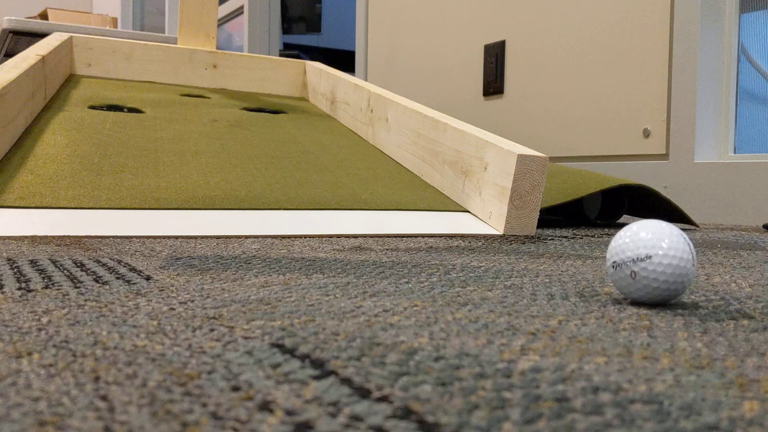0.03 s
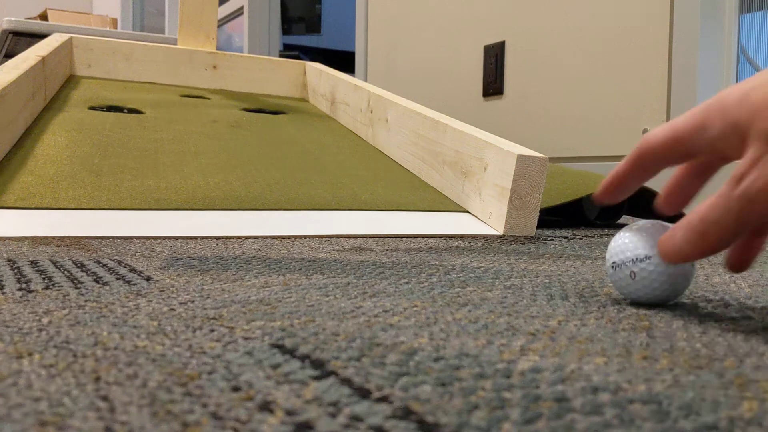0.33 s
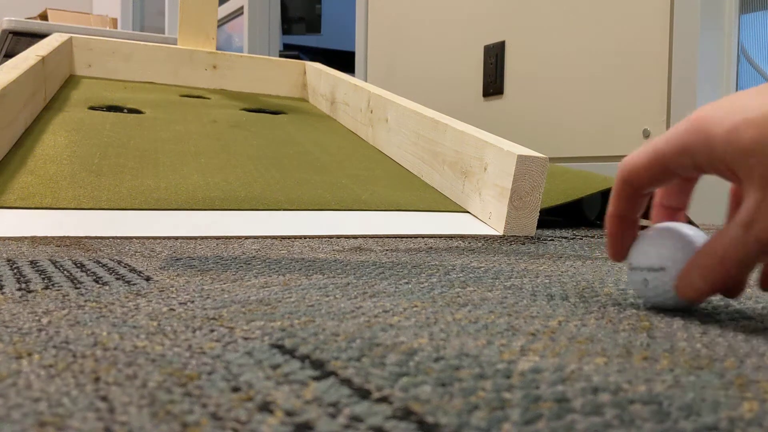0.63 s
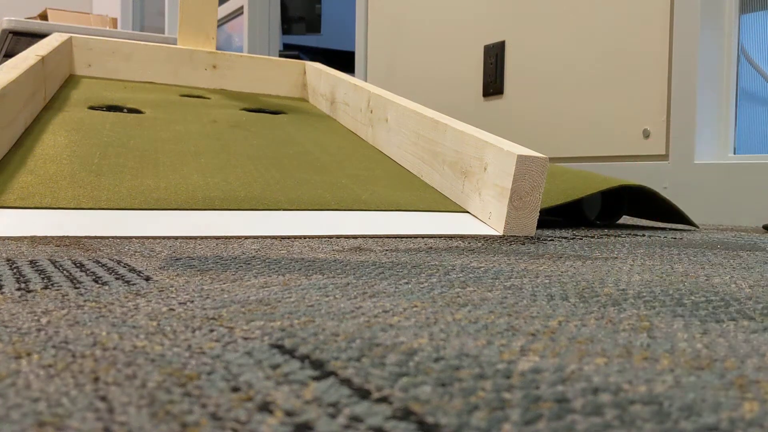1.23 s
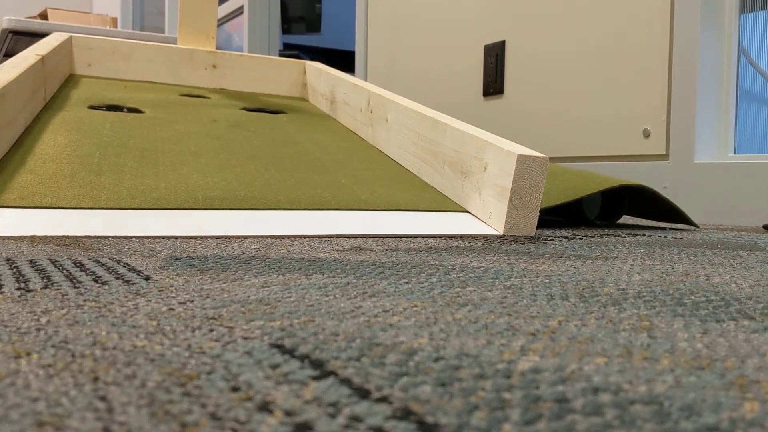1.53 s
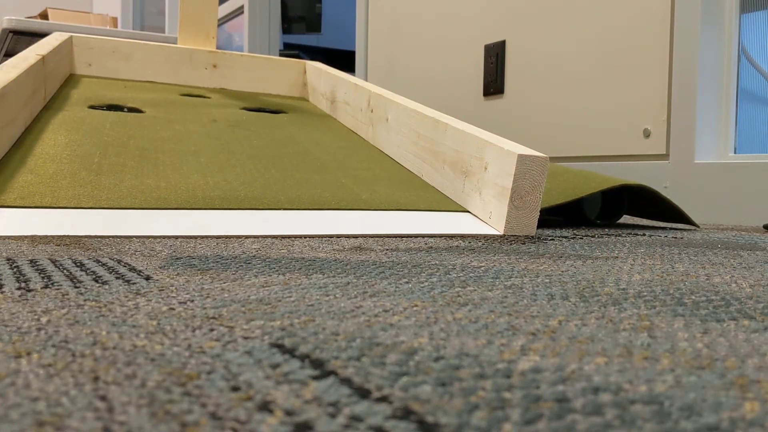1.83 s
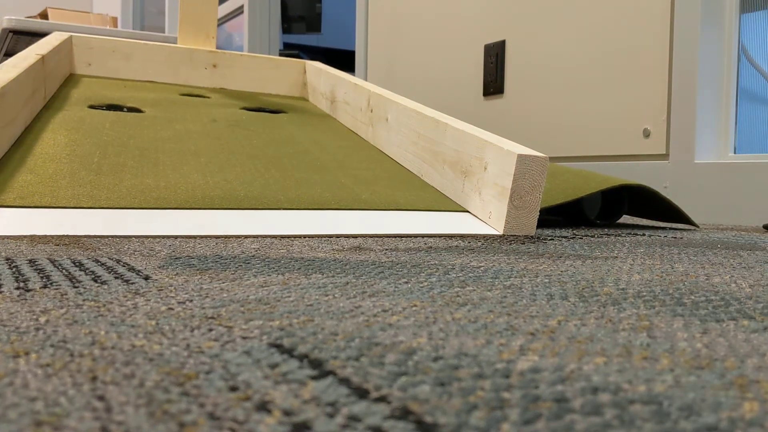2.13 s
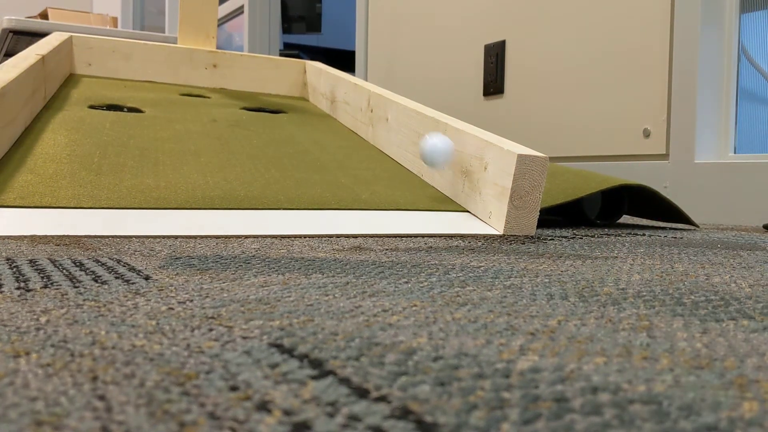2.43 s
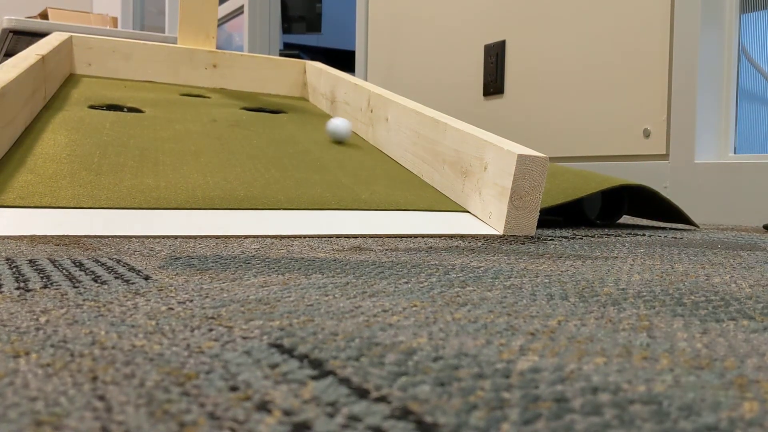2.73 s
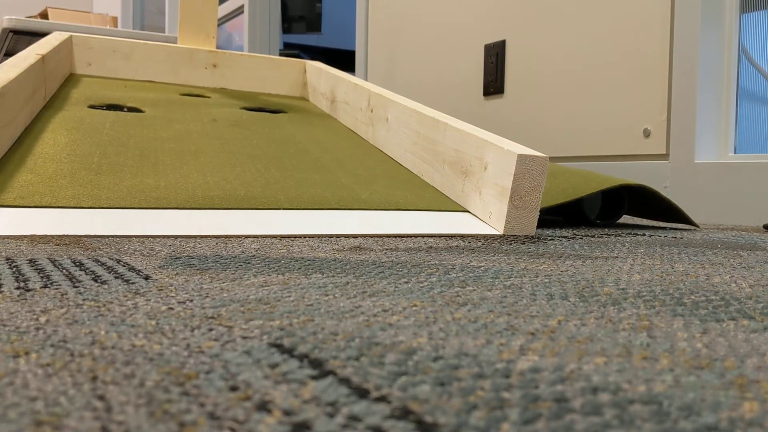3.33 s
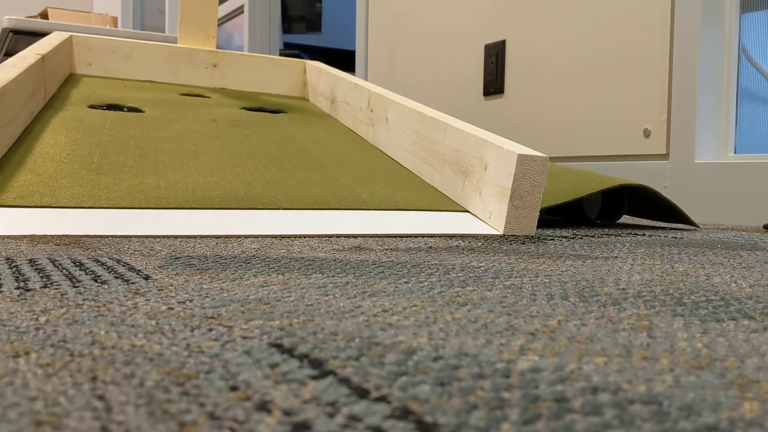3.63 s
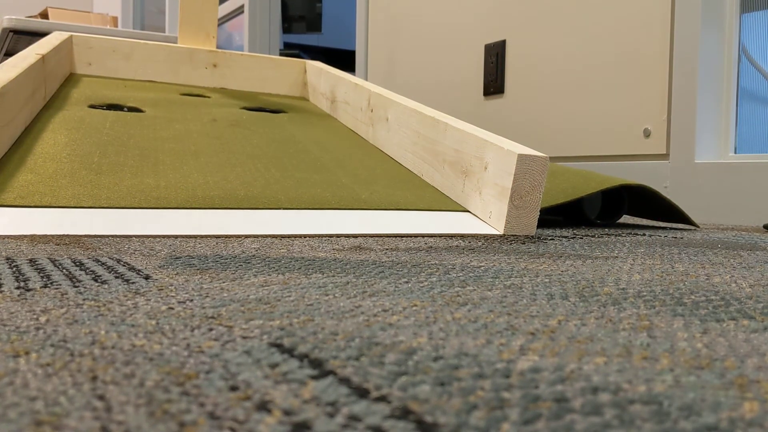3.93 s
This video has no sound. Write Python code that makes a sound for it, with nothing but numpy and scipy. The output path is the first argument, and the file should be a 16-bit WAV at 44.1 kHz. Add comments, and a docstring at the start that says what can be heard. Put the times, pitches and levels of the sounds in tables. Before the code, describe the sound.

A golf ball is putted up a wooden ramp into a hole, heard from the floor of a small room. At first there is only low ventilation rumble and faint rustling. At 2.5 seconds the ball bangs on the ramp's lip, bounces softly on felt and rolls with a fading rumble. From about 3.3 to 3.7 seconds it rattles into the hole with hollow wooden knocks and hard clicks.

```python
"""Ventilation rumbles in a small quiet room, heard from the floor; carpet and cloth rustle faintly.
A golf ball, putted over the carpet, bangs on the lip of a felt-covered wooden ramp at 2.5 s and rings
its modes. It bounces ever more softly, each landing flexing the board, and rolls uphill with a fading
rumble. From 3.3 s it tips over the rim of a hole and rattles down into it: the wooden box knocks
hollowly and the ball's hard shell clicks."""
import sys
import numpy as np
from scipy import signal
from scipy.fft import rfft, irfft, next_fast_len
from scipy.io import wavfile

SR = 44100
rng = np.random.default_rng(int(sys.argv[2]) if len(sys.argv) > 2 else 0)


def pcm_store(signal):
    """Save signal as 16-bit PCM."""
    levels = np.round(np.clip(np.atleast_2d(signal), -1, 1) * 32767)
    wavfile.write(sys.argv[1], SR, levels.astype(np.int16).T)


N = 176400


def amp(db):
    """Decibels to gain."""
    return 10 ** (np.asarray(db) / 20)


def along(points, hz):
    """Interpolate (frequency, value) points on a log axis."""
    freqs, values = np.transpose(points)
    return np.interp(np.log(hz + 1), np.log(freqs + 1), values)


def filtered(x, response):
    """Apply a zero-phase gain given as a function of frequency."""
    size = x.shape[-1]
    padded = next_fast_len(2 * size)
    return irfft(rfft(x, padded) * response(np.fft.rfftfreq(padded, 1 / SR)), padded)[..., :size]


def fade(t, t60_s):
    """Exponential decay."""
    return np.exp(-np.log(1000) * t / t60_s)


def onset(t, attack_s):
    """Exponential rise to 1."""
    return 1 - np.exp(-t / attack_s)


def swell(peak_s, rise_s, fall_s):
    """Bell envelope with separate rise and fall."""
    t = np.arange(N) / SR
    return np.exp(-((t - peak_s) / np.where(t < peak_s, rise_s, fall_s)) ** 2 / 2)


def pan(db):
    """Stereo gains: left up, right down by db."""
    return amp([[db], [-db]])


def add(track, start_s, sound):
    """Mix a sound in at start_s."""
    i = round(start_s * SR)
    track[:, i:i + sound.shape[1]] += sound[:, :N - i]


# Left-right likeness of the room's sound: (frequency [Hz], coherence [0..1])
ROOM_COHERENCE = [(100, 1), (300, 0.72), (700, 0.35), (1500, .1), (5000, 0.013)]


def noise(colour_db, size=N, coherence=ROOM_COHERENCE):
    """Stereo noise of rms 1; the mid/side balance sets the coherence at each frequency."""
    def mid_side_gains(hz):
        angle = np.arccos(np.clip(along(coherence, hz), -1, .9995)) / 2
        return amp(colour_db(hz)) * [np.cos(angle), np.sin(angle)]
    mid, side = filtered(rng.standard_normal((2, size)), mid_side_gains)
    stereo = np.array([mid + side, mid - side])
    return stereo / np.sqrt(np.mean(stereo ** 2) + 1e-20)


# Room decay: (frequency [Hz], t60 [s])
ROOM_T60 = [(100, 1), (500, 0.53), (1200, .42), (4000, 0.28), (12000, .22)]


def in_room(sound, wet_db=-11):
    """Add a diffuse tail whose treble dies first."""
    size = sound.shape[1]
    hz, t, spectrum = signal.stft(noise(np.zeros_like, size), SR, nperseg=256)
    spectrum = spectrum * fade(t, along(ROOM_T60, hz)[:, None]) * onset(t, attack_s=0.0045)
    tail = signal.istft(spectrum, SR, nperseg=256)[1]
    tail /= np.linalg.norm(tail[0])
    return sound + amp(wet_db) * signal.fftconvolve(sound, tail, axes=1)[:, :size]


# Ventilation spectrum: (frequency [Hz], gain [dB])
VENT_COLOUR = [(12, -55), (20, 1), (38, -1), (87, -5), (116, -12), (238, -16), (282, -21.5), (306, -22.5),
               (519, -20), (565, -22.5), (906, -29), (1670, -40), (1980, -45.5), (5690, -47), (15500, -55)]
# Its left-right likeness: (frequency [Hz], coherence [0..1])
VENT_COHERENCE = [(60, 1), (150, .96), (400, .78), (1000, .45), (3000, .1), (12000, .05)]


def ventilation():
    """Steady rumble and hiss, with a narrow noise band as a fuzzy hum."""
    hum_hz, half_width_hz = 83.8, 8.3
    air = noise(lambda hz: along(VENT_COLOUR, hz), N, VENT_COHERENCE)
    hum = noise(lambda hz: -20 * np.log10(1 + ((hz - hum_hz) / half_width_hz) ** 2), N, VENT_COHERENCE)
    return amp(-45.5) * air + amp(-53.5) * hum


# Swishes: (peak time [s], rise [s], fall [s], level [dB], band centre [Hz])
RUSTLES = [(.18, 0.068, .08, -70, 7000), (.41, 0.13, .1, -65.5, 12500), (1.62, 0.11, .06, -73.5, 1700),
           (1.78, .08, 0.21, -74, 9000), (2.075, .008, 0.0096, -68, 13000), (2.245, 0.011, .014, -55, 6000),
           (2.272, .028, .02, -63, 12900)]


def rustles():
    """Carpet and cloth swish: swelling noise bands, 6 dB down an octave off centre."""
    out = np.zeros((2, N))
    for peak_s, rise_s, fall_s, db, centre_hz in RUSTLES:
        band = noise(lambda hz: -6 * np.log2((hz + 1) / centre_hz) ** 2)
        out += amp(db) * swell(peak_s, rise_s, fall_s) * band
    return out


# Scuffs: (peak time [s], rise [s], fall [s], level [dB])
SCUFFS = [(.232, .004, 0.0088, -68.5), (2.525, 0.0022, 0.0033, -55), (2.545, .015, 0.017, -64.5),
          (2.743, .009, 0.012, -54.5), (2.78, 0.0092, .015, -64), (2.826, .012, 0.0155, -67),
          (3.836, 0.0216, 0.011, -61)]
# Scuff spectrum: (frequency [Hz], gain [dB])
SCUFF_COLOUR = [(1500, -25), (2600, -11.5), (3300, 3.5), (4600, -3.5), (5700, 2.5), (7000, -9),
                (10000, -13), (15000, -22.5)]


def scuffs():
    """Short dry puffs of bright noise."""
    envelope = sum(amp(db) * swell(peak_s, rise_s, fall_s) for peak_s, rise_s, fall_s, db in SCUFFS)
    return envelope * noise(lambda hz: along(SCUFF_COLOUR, hz))


def ringing(modes, t):
    """Damped modes, excited anew by each blow; they arrive left and right out of step."""
    scatter_db, spread_rad_per_khz = 5, 0.35
    ring = np.zeros((2, len(t)))
    for k, (hz, db, t60_s) in enumerate(modes):
        phase = spread_rad_per_khz * rng.normal() * hz / 1000 * np.array([[1], [-1]])
        gain = (-1) ** k * amp(db + scatter_db * rng.normal())
        ring += gain * fade(t, t60_s) * np.sin(2 * np.pi * hz * t + phase)
    return ring


def knock(modes, grain, grain_db, lowpass_hz, highpass_hz, grain_t60_s, attack_s):
    """Wood rings in clear modes over dense grain; soft contact cuts treble, a stiff spot cuts bass."""
    t = np.arange(SR // 2) / SR
    dense = amp(grain_db) * fade(t, grain_t60_s) * noise(lambda hz: along(grain, hz), len(t))
    wood = (ringing(modes, t) + dense) * onset(t, attack_s)
    softness = signal.butter(4, lowpass_hz, fs=SR, output="sos")
    stiffness = signal.butter(1, highpass_hz, "high", fs=SR, output="sos")
    blow = signal.sosfilt(np.vstack([softness, stiffness]), wood)
    return in_room(blow * pan(-0.33))


# Blows on the ramp: (time [s], gain [dB], low-pass [Hz], high-pass [Hz], grain gain [dB])
RAMP_HITS = [(2.4978, -22, 2250, 50, 4), (2.5069, -16, 850, 150, -3), (2.527, -33.5, 1600, 301, 7.5),
             (2.638, -19, 1183, 500, -23)]
# Ramp modes: (frequency [Hz], gain [dB], t60 [s])
RAMP_MODES = [(132, -6, 0.059), (188, -14, 0.074), (230, -13.5, 0.16), (257.6, -8.5, 0.2),
              (436, -19.5, .13), (497, -2.5, 0.051), (593, -12, 0.067), (665.6, -6.5, .11),
              (981, -1, 0.047), (1066, -14, 0.056), (1286, -24, 0.14), (1490, -11, 0.04),
              (1710, -10.5, 0.027)]
# Spectrum of its dense weak modes: (frequency [Hz], gain [dB])
RAMP_GRAIN = [(80, -26), (200, -15), (600, -4), (1200, -6), (2000, -15.5), (3000, -13), (5000, -11),
              (15000, -31.5)]


def ramp_knocks():
    """The ball bangs on the wooden lip, then knocks on it three more times."""
    out = np.zeros((2, N))
    for start_s, db, lowpass_hz, highpass_hz, grain_db in RAMP_HITS:
        blow = knock(RAMP_MODES, RAMP_GRAIN, grain_db, lowpass_hz, highpass_hz,
                     grain_t60_s=0.059, attack_s=0.001)
        add(out, start_s, amp(db) * blow)
    return out


# Rolling envelope: (time [s], level [dB])
ROLL_LEVEL = [(2.5, -62), (2.56, -45), (2.75, -45), (2.86, -55.5), (2.999, -63), (3.302, -80)]
# Rolling spectrum: (frequency [Hz], gain [dB])
ROLL_COLOUR = [(40, -10), (110, -21), (210, -6), (350, -2.5), (700, -11), (1200, -30), (3000, -54)]


def rolling():
    """The ball rolls up the felt with a fading rumble."""
    times_s, levels_db = np.transpose(ROLL_LEVEL)
    envelope = amp(np.interp(np.arange(N) / SR, times_s, levels_db, left=-120, right=-120))
    return envelope * noise(lambda hz: along(ROLL_COLOUR, hz))


# Landings on the felt: (time [s], gain [dB], pitch [Hz], t60 [s])
THUDS = [(2.536, -25, 185, .05), (2.6925, -24.5, 163, 0.04), (2.723, -27.5, 215, 0.094),
         (2.801, -31, 208, 0.069), (2.816, -29.5, 134, 0.14), (2.827, -43, 275, 0.024)]


def thuds():
    """Cushioned by felt, each landing only flexes the board; the pitch depends on the spot."""
    overtone_ratio, overtone_db = 1.9, -14
    out, t = np.zeros((2, N)), np.arange(SR // 2) / SR
    for start_s, db, hz, t60_s in THUDS:
        flex = ringing([(hz, 0, t60_s), (hz * overtone_ratio, overtone_db, t60_s)], t)
        add(out, start_s, amp(db) * in_room(flex * onset(t, attack_s=0.0023), wet_db=-14.5))
    return out


# Contacts in the hole: (time [s], knock gain [dB], low-pass [Hz], high-pass [Hz], click gain [dB])
HOLE_HITS = [(3.329, -32.5, 1420, 100, -78), (3.4435, -15, 750, 450, -41.5), (3.4602, -16, 1660, 397, -37),
             (3.4808, -13, 840, 377, -31), (3.491, -13, 640, 100, -58), (3.5036, -35.5, 1230, 100, -37),
             (3.527, -32, 1800, 400, -47), (3.5356, -8, 1050, 454, -30), (3.5415, -27, 1430, 900, -65),
             (3.5575, -36, 1190, 100, -35.5), (3.571, -24.5, 1240, 150, -39),
             (3.591, -29.5, 1820, 150, -50), (3.614, -41.5, 1770, 300, -63)]
# Modes of the hole and the box below: (frequency [Hz], gain [dB], t60 [s])
HOLE_MODES = [(154, -15.5, 0.085), (255.5, -26, 0.2), (350, -21, .19), (401.5, -21.5, 0.21),
              (453.5, -10.5, 0.061), (545.5, -7.5, 0.14), (651, -4, 0.029), (715, -13.5, .11),
              (967, -7, .06), (1035, -12, 0.058), (1127, -13.5, 0.067), (1376, -26.5, 0.11),
              (2660, -28, 0.043)]
# Spectrum of their dense modes: (frequency [Hz], gain [dB])
HOLE_GRAIN = [(80, -18), (320, -12), (560, 0), (1000, -4), (1450, -12), (3000, -5), (15000, -31)]
# Click spectrum of the hard shell: (frequency [Hz], gain [dB])
SHELL_COLOUR = [(500, -30), (1500, 7), (2600, 4), (3300, -1.5), (4300, 7), (5000, -2), (5800, 2),
                (10000, -2.5), (15000, -14)]
# Rim clack modes: (frequency [Hz], gain [dB], t60 [s])
RIM_MODES = [(1790, -25, .055), (2720, -43, .03)]


def hole_rattle():
    """The ball clacks on the rim and rattles down: each contact is a hollow knock and a shell click."""
    out, t = np.zeros((2, N)), np.arange(SR // 2) / SR
    attack = onset(t, attack_s=0.0018)
    add(out, start_s=3.4435, sound=in_room(ringing(RIM_MODES, t) * attack))
    for start_s, db, lowpass_hz, highpass_hz, click_db in HOLE_HITS:
        blow = knock(HOLE_MODES, HOLE_GRAIN, grain_db=-2.5, lowpass_hz=lowpass_hz,
                     highpass_hz=highpass_hz, grain_t60_s=0.055, attack_s=0.00075)
        add(out, start_s, amp(db) * blow)
        click = noise(lambda hz: along(SHELL_COLOUR, hz), len(t)) * fade(t, t60_s=0.03) * attack
        add(out, start_s, amp(click_db) * in_room(click * pan(0.2), wet_db=-5))
    return out


def scene():
    """The putt over the quiet sounds of the room."""
    ball = rolling() + ramp_knocks() + thuds() + hole_rattle()
    return ball + scuffs() + rustles() + ventilation()


# Microphone port resonances: (frequency [Hz], width [Hz], gain [dB])
PORT_PEAKS = [(4240, 440, 2.5), (5670, 500, 7.5), (7610, 340, 4.5), (9600, 230, 6.5), (11900, 370, 5.5)]
# Lean to the left: (frequency [Hz], left boost and right cut [dB])
PORT_LEAN = [(250, 0.45), (600, 1.5), (1200, 1.7), (2200, -0.4), (3200, 1), (4500, 0.9), (8000, 1.9),
             (15000, 3.2)]


def port_response(hz):
    """Gains of the two microphone ports: treble peaks, a treble shelf, a lean that spares the bass."""
    centred_below_hz = 300
    peaks_db = sum(db * np.exp(-((hz - peak_hz) / width_hz) ** 2) for peak_hz, width_hz, db in PORT_PEAKS)
    shelf_db = -4 * np.clip((hz - 3000) / 2000, 0, 1)
    lean_db = along(PORT_LEAN, hz) * np.clip(hz / centred_below_hz, 0, 1) ** 2
    return amp(peaks_db + shelf_db + lean_db * np.array([[1], [-1]]))


def record(dry):
    """The ports colour the treble; the sound opens after a moment, the bass a little later."""
    open_s, open_ramp_s, top_hz = 0.081, 0.016, 15850
    bass_hz, early_bass_db, bass_full_s, bass_ramp_s = 140, -12, 0.312, 0.079
    t = np.arange(N) / SR
    x = filtered(dry, port_response)
    bass = filtered(x, lambda hz: 1 / (1 + (hz / bass_hz) ** 4))
    x -= bass * (1 - amp(early_bass_db)) * np.clip((bass_full_s - t) / bass_ramp_s, 0, 1)
    x *= np.clip((t - open_s) / open_ramp_s + .5, 0, 1)
    return filtered(x, lambda hz: hz < top_hz)


dry = scene()
out = record(dry)
pcm_store(out)
```